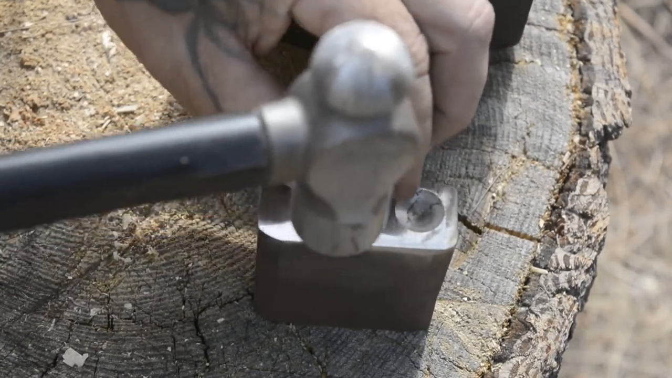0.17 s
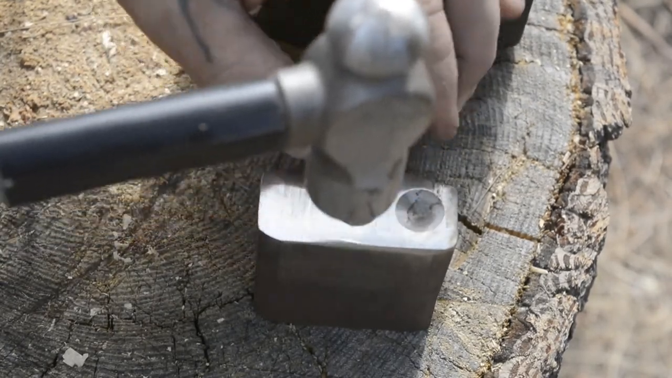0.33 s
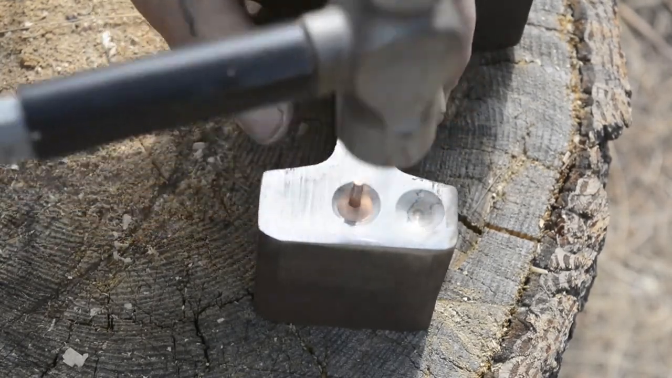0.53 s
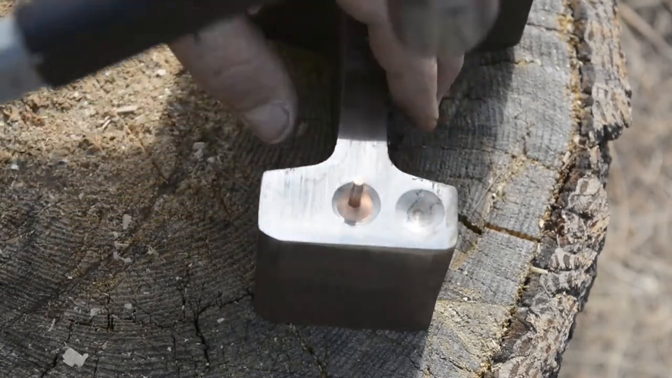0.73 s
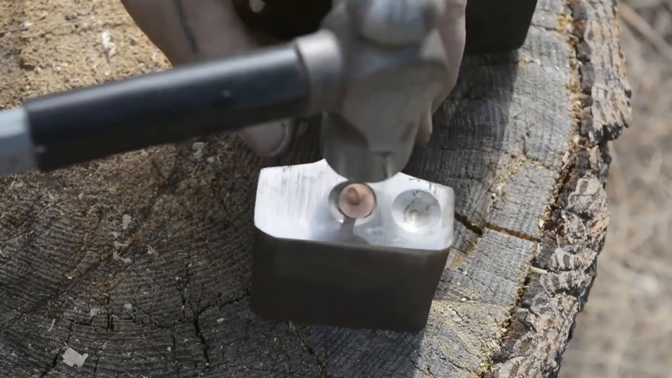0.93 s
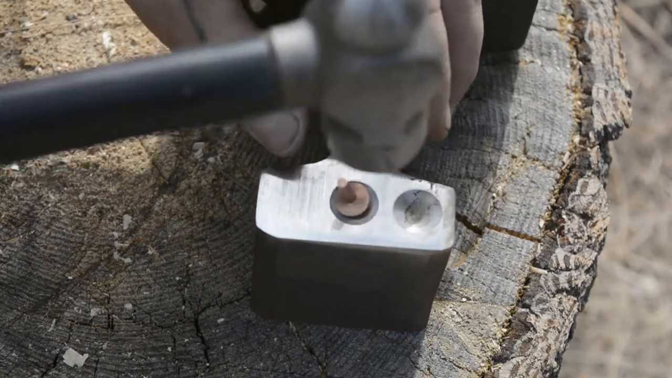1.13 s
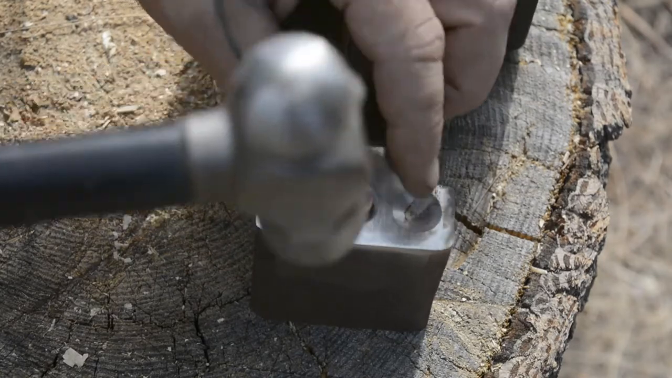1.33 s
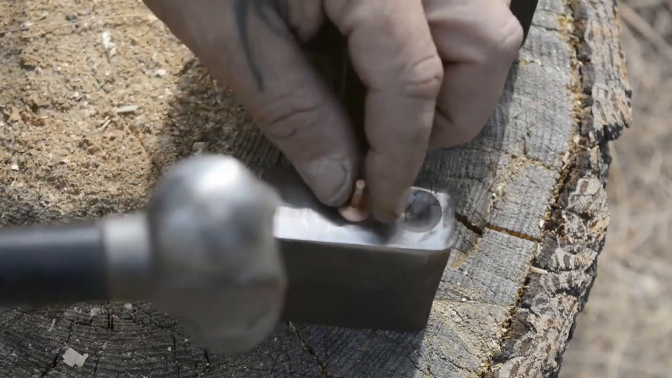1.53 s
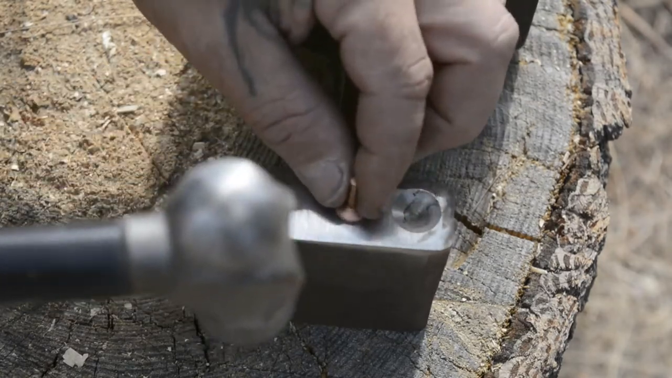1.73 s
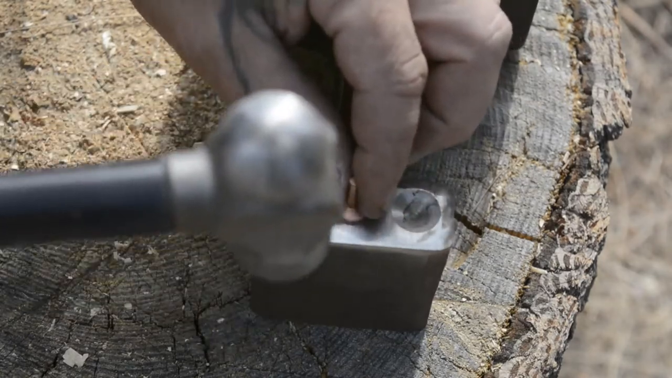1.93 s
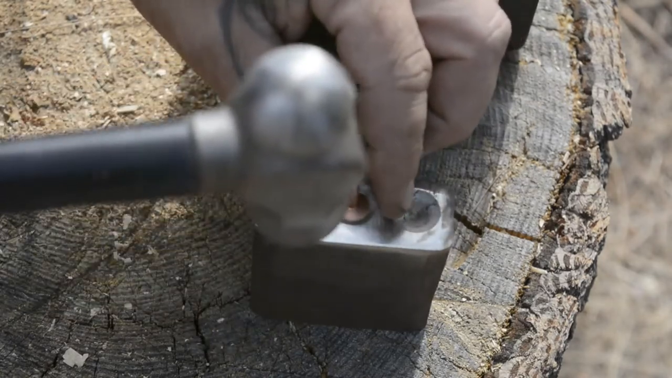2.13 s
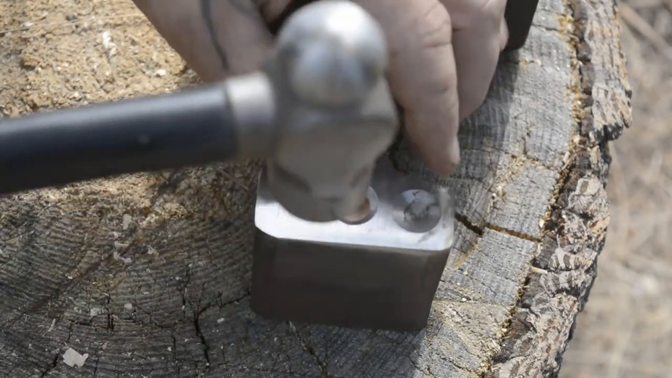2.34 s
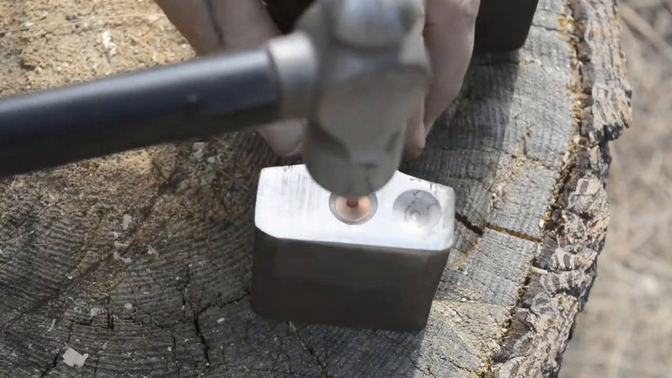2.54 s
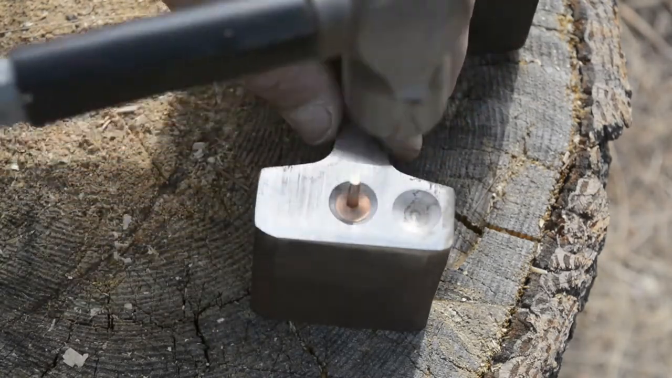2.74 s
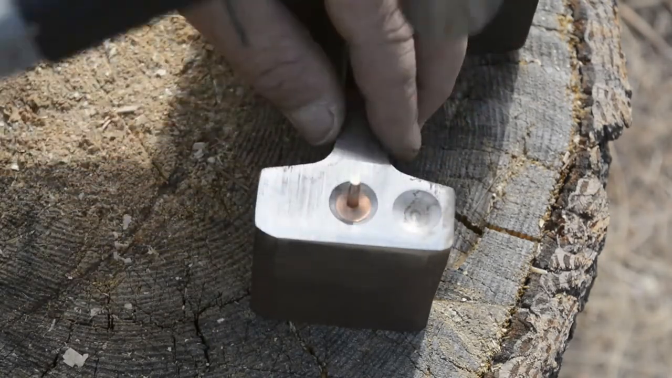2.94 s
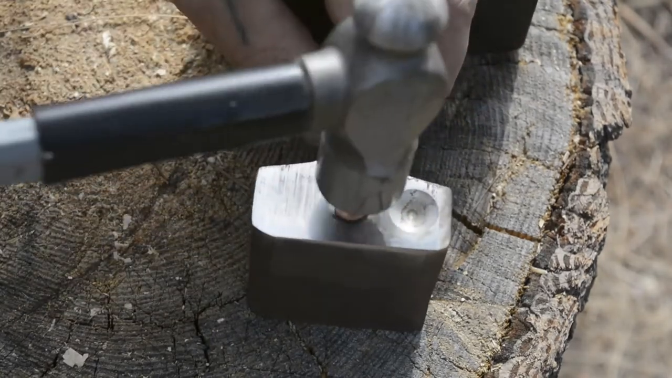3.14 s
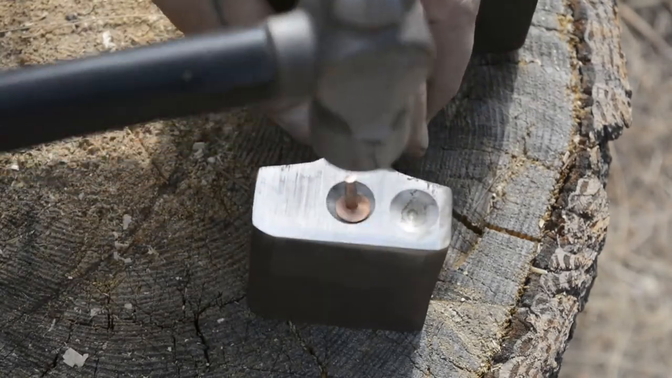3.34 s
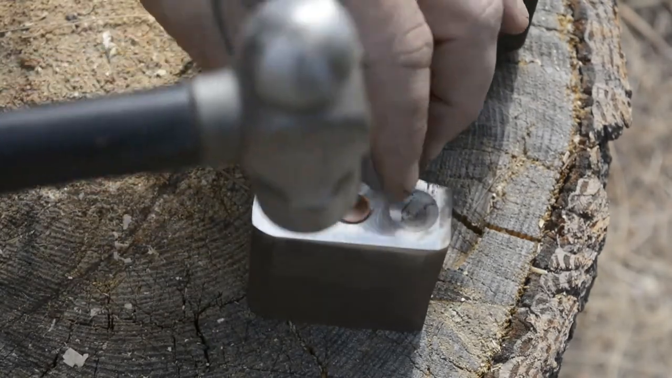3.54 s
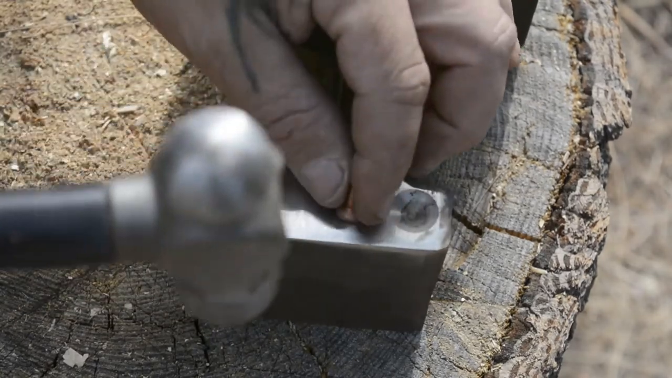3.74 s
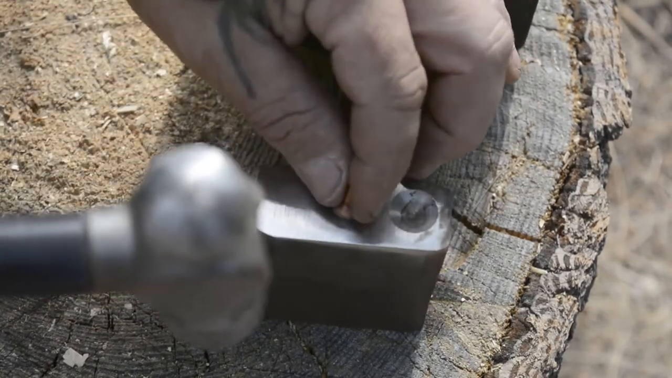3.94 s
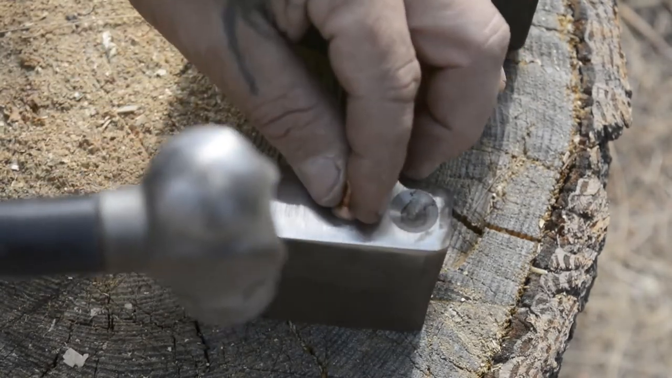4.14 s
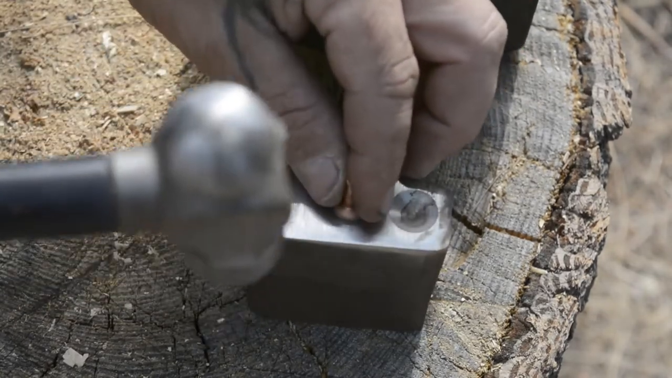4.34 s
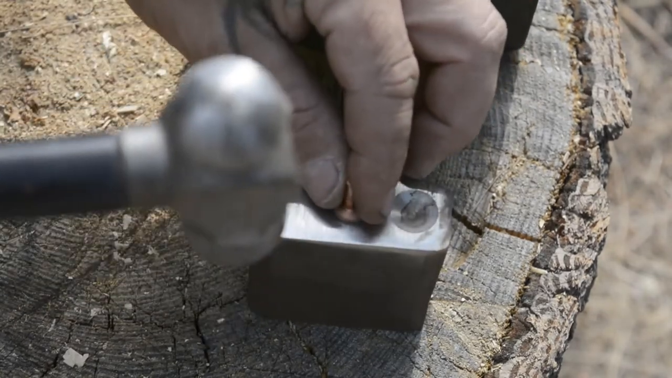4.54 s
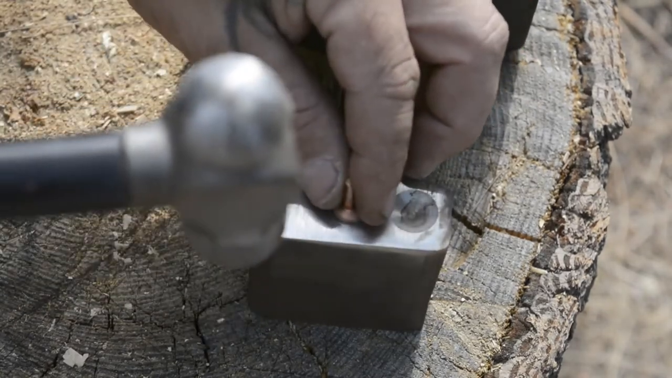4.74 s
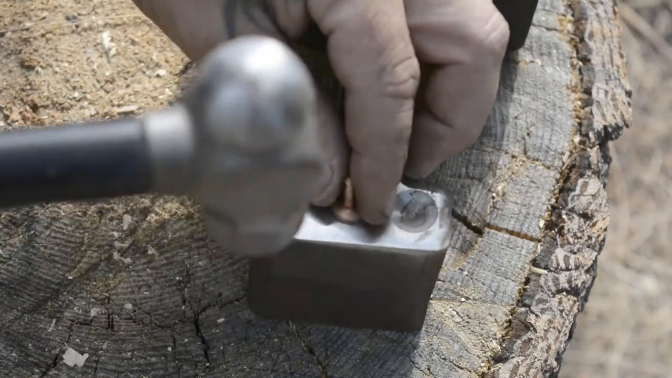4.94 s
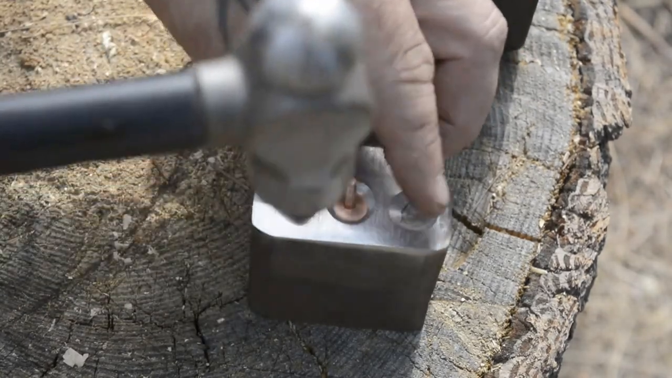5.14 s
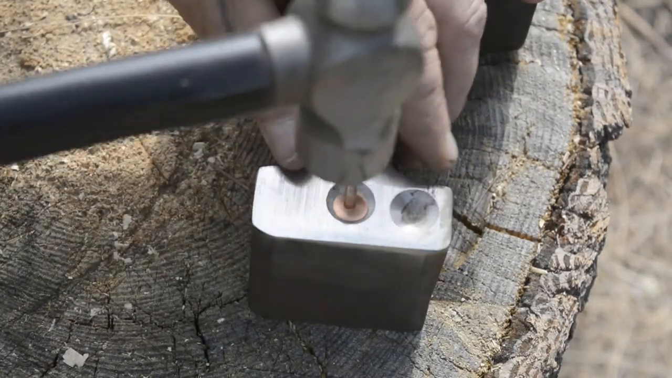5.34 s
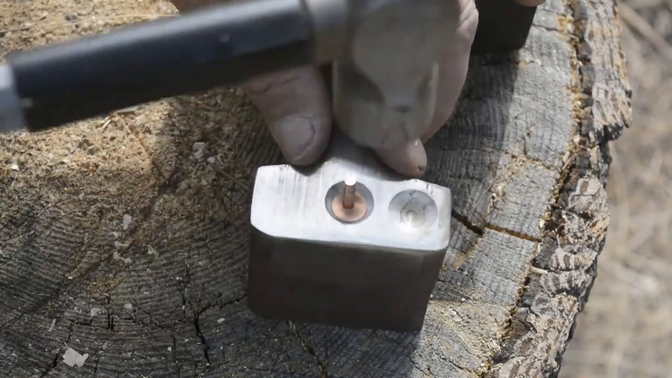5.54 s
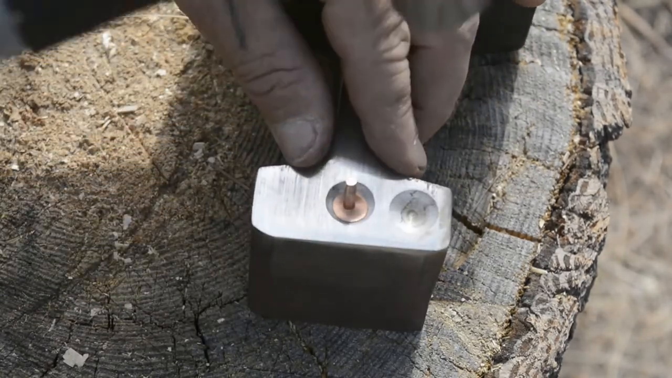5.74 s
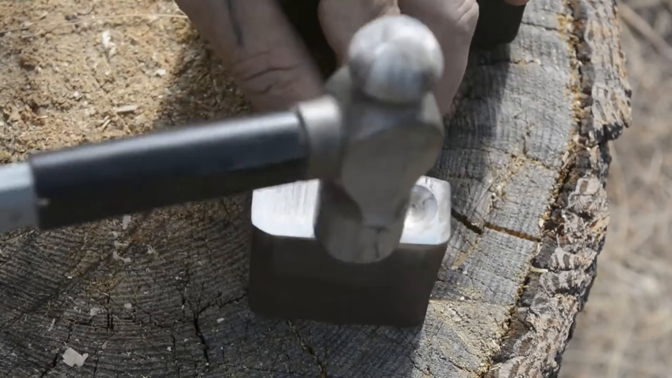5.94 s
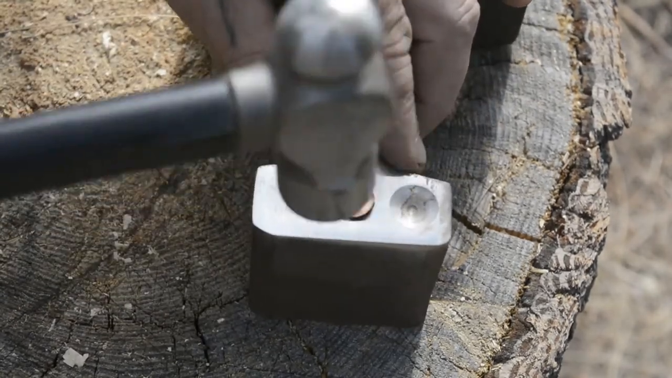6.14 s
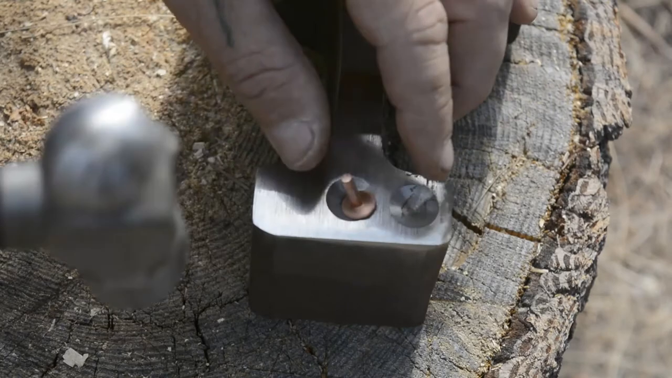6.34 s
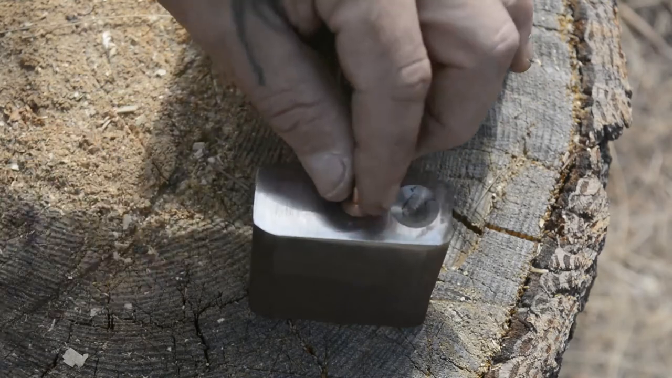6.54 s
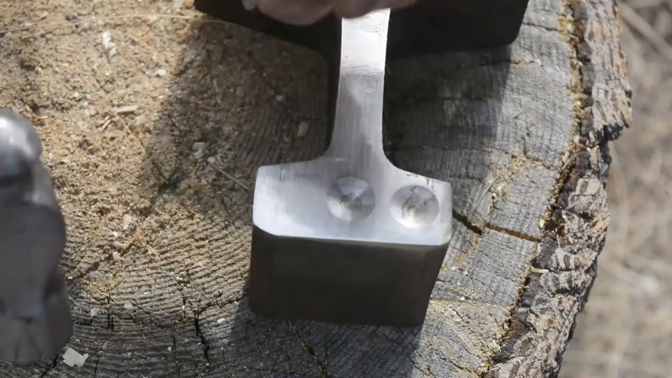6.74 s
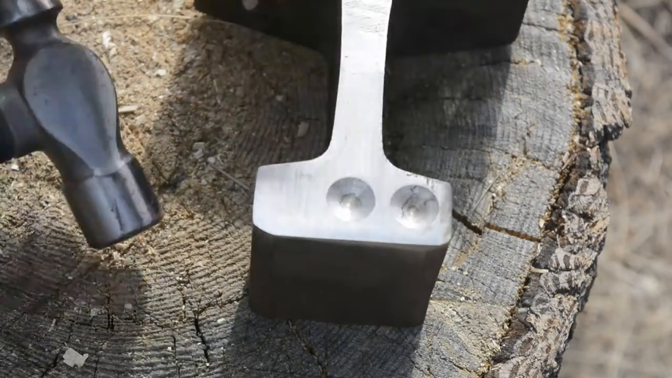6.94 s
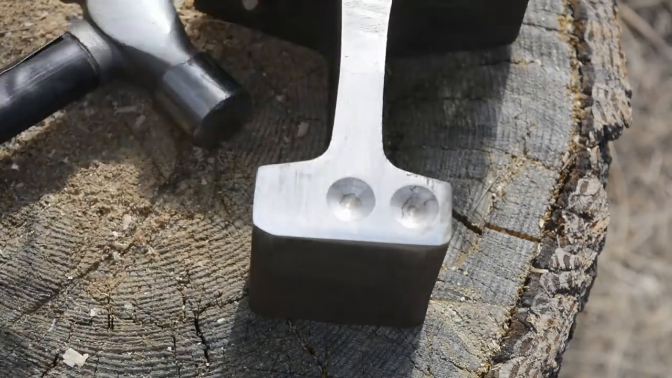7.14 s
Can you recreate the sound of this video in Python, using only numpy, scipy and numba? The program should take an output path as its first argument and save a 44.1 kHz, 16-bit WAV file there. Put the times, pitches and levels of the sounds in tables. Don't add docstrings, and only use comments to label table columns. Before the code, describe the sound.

Three widely spaced hammer blows crack on a copper rivet in a steel block, thudding into a wooden stump outdoors, with short rings and rattles.

```python
import sys
import numpy as np
from scipy import signal
from scipy.fft import rfft, irfft, next_fast_len
from scipy.io import wavfile
from scipy.ndimage import uniform_filter1d
from numba import njit

SR = 44100
rng = np.random.default_rng(int(sys.argv[2]) if len(sys.argv) > 2 else 0)


def invert_db(level):
    return 10 ** (np.asarray(level, dtype=float) / 20)


def inscribe(sig):
    pcm = np.round(np.clip(np.atleast_2d(sig).T, -1, 1) * 32767)
    wavfile.write(sys.argv[1], SR, pcm.astype(np.int16))


N = 316939


def level(x, db):
    return x * invert_db(db) / np.sqrt(np.mean(x ** 2))


def peak(x, db):
    return invert_db(db) * x / np.max(np.abs(x))


def clock(length_s):
    return np.arange(int(length_s * SR)) / SR


def add(out, start_s, sound):
    i = int(start_s * SR)
    out[i:i + len(sound)] += sound[:max(N - i, 0)]


def fade(t, t60_s):
    return np.exp(-np.log(1000) * t / t60_s)


def ring(modes, length_s):
    t = clock(length_s)
    return sum(invert_db(db) * fade(t, t60_s) * np.sin(2 * np.pi * hz * t) for hz, db, t60_s in modes)


def knock(modes, contact_s, db, grit_db=-27):
    push = np.sin(2 * np.pi * np.linspace(0, 1, max(int(2 * contact_s * SR), 4)))
    grit = invert_db(grit_db) * rng.standard_normal(900) * fade(np.arange(900) / SR, 0.039)
    grit[0] = 1
    pushed = signal.fftconvolve(ring(modes, 0.12), push)
    return peak(signal.fftconvolve(pushed, grit), db)


def coloured(points, db):
    hz, shape_db = np.transpose(points)
    size = next_fast_len(N)
    bins_hz = np.arange(size // 2 + 1) * SR / size + 1
    gain = invert_db(np.interp(np.log(bins_hz), np.log(hz), shape_db))
    return level(irfft(rfft(rng.standard_normal(size)) * gain, size)[:N], db)


# start_s, thud_db, crack_db, contact_ms, ring_time_factor
BLOWS = [
    (0.7612, 1, -5.5, 0.85, 0.88),
    (2.9607, 1.5, -9, 0.5, 0.7),
    (5.7778, -1.5, -9.5, 0.587, 0.61),
]
# freq_hz, level_db, t60_s
STUMP = [(140, -49, 0.026), (244, -8, 0.051), (378, 17.5, 0.0067), (507, 4.5, 0.033), (641, 4.5, 0.04),
         (786, 11.5, 0.047), (886, 7, 0.014), (1050, 3, 0.046), (1161, 8, 0.007), (1390, 2.5, 0.011),
         (1802, -2.5, 0.073), (1930, -26, .015)]
# freq_hz, level_db, t60_s
SNAP = [(1130, -3, 0.018), (1382, 7, 0.0068), (1717, -20.5, 0.014), (2810, -13, 0.0013), (3370, -8, 0.0038)]
# freq_hz, level_db, t60_s
CRACK = [(2940, 11, 0.0022), (4240, -24, .004), (5300, -3.5, 0.0057), (5710, 7.5, 0.0035),
         (6780, -21, 0.003), (8680, -2, 0.0048), (10500, 9.5, 0.00089), (11700, 3, 0.0011),
         (15200, -23, 0.0034)]
STEEL_HZ = [1711, 2296.2, 2296.8, 4705, 5987, 7192, 7973, 9585, 11600, 12200, 14360]
# t60_s, first_blow_db, second_blow_db, third_blow_db
STEEL = [(1.34, -57.5, -51, -42), (2.9, -57, -72, -83), (0.74, -36.5, -28.5, -28), (0.55, -53, -44, -53),
         (0.73, -49.5, -43, -48), (0.48, -45, -35.5, -39.5), (0.64, -77, -62, -58), (0.62, -52, -53, -60),
         (1.2, -63, -74, -60), (0.19, -49, -70, -62), (0.42, -61.5, -66.5, -64)]


def copper_crack(db):
    t, slip_s = np.arange(200) / SR, 0.00054
    slips = rng.standard_normal(200) * t * np.exp(-t / slip_s)
    return peak(signal.fftconvolve(ring(CRACK, 0.03), slips), db)


def steel_ring(blow, time_factor):
    lift_s, rocks_s, free_db_per_s = 0.0055, 0.082, 26
    modes = [(hz, row[1 + blow] + 6.24, row[0] * time_factor * 0.96) for hz, row in zip(STEEL_HZ, STEEL)]
    steel = ring(modes, 1.2)
    since = np.arange(len(steel)) / SR
    hold = invert_db(-free_db_per_s * np.maximum(rocks_s - since, 0))
    return steel * hold * np.minimum(since / lift_s, 1)


def blows():
    out = np.zeros(N)
    for k, (start_s, thud_db, crack_db, contact_ms, time_factor) in enumerate(BLOWS):
        add(out, start_s, knock(STUMP, contact_ms / 1000, thud_db + 7, grit_db=-33))
        add(out, start_s, knock(SNAP, 0.00025, 8.5, grit_db=-31.5))
        add(out, start_s, copper_crack(crack_db + 9.5))
        add(out, start_s, steel_ring(k, time_factor))
    return out


# start_s, level_db, contact_ms
BUMPS = [(0.7884, -14, 0.5), (0.7955, -19.5, 0.32), (0.8125, -21, 0.37), (0.815, -14, 1.02),
         (0.8198, -27, 0.42), (0.844, -32, 1.8), (0.852, -27.5, 2.7), (0.860, -35, 0.92),
         (2.9963, -20, 1.06), (3.002, -26, 0.31), (3.0113, -10, 0.75), (3.035, -19, 0.56),
         (3.0409, -17, 0.72), (3.0542, -23, 1.36), (3.0595, -33, 0.48), (3.068, -31, 1.7),
         (3.076, -37, 1.9), (3.0806, -37.5, 1.16), (4.434, -46, 0.67), (4.465, -48, 1.3),
         (5.8189, -15.5, 0.62), (5.823, -38, 0.67), (5.830, -26, 0.52), (5.838, -22.5, 0.94),
         (5.855, -33, 1.2), (6.889, -54, 1.5)]


def rocking():
    out = np.zeros(N)
    for start_s, db, contact_ms in BUMPS:
        add(out, start_s, -knock(STUMP, contact_ms / 1000, db + 3, grit_db=-21.5))
    return out


def rim_clicks():
    out = np.zeros(N)
    for start_s, db, _ in BUMPS:
        add(out, start_s, knock(SNAP, 0.00023, db - 11.5, grit_db=-18))
    return out


# start_s, level_db, pitch_hz
TICKS = [(.781, -25, 12900), (.785, -17, 10700), (.7878, -34, 9600), (.7955, -33, 10000), (.804, -34, 8600),
         (0.8097, -39, 10500), (0.8145, -29, 10000), (.855, -42, 9750), (2.9932, -30, 10600),
         (2.9975, -29, 11800), (3.0035, -39, 8600), (3.008, -17.5, 12700), (3.018, -45, 12200),
         (3.0362, -42, 10500), (3.0414, -41, 12000), (3.0584, -40, 12400), (3.0678, -29, 12500),
         (5.8226, -35, 10200), (5.831, -40, 11000), (5.8335, -33, 12900), (5.8345, -33, 10500),
         (5.850, -40, 10700)]
# start_s, level_db, pitch_hz
CLINKS = [(.785, -30, 6060), (.7965, -33, 4500), (0.804, -28.5, 6260), (0.81, -34, 3360),
          (0.814, -35, 6300), (.845, -46, 6000), (3.0044, -49, 3800), (3.007, -38, 6000),
          (3.036, -41, 5000), (3.0444, -50, 5400), (5.7884, -40, 4670), (5.8202, -36, 3400),
          (5.825, -45, 5500), (5.832, -41, 5200), (5.834, -33, 6000), (5.8554, -48, 3400)]


def rattle():
    out = np.zeros(N)
    for start_s, db, hz in TICKS + CLINKS:
        t60_s = 62 / hz
        contacts = rng.standard_normal(70) * np.hanning(70)
        cluster = [(hz, 0, t60_s), (hz * 0.9, -5, t60_s * 0.7), (hz * 1.1, -5, t60_s * 0.7),
                   (hz * 0.76, -18, t60_s * 0.6), (hz * 1.22, -14, t60_s * 0.5)]
        tick = signal.fftconvolve(ring(cluster, 0.03), contacts)
        tick = signal.sosfilt(signal.butter(3, hz * 0.8, "high", fs=SR, output="sos"), tick)
        add(out, start_s, peak(tick, db + 8))
    return out


# start_s, level_db
LAID = [
    (7.1803, -17.5),
]
# freq_hz, level_db, t60_s
PLANK = [(450, -18, 0.018), (724, 3, 0.012), (1090, 4, 0.0086), (1660, -6.5, 0.11), (2140, -20, 0.014),
         (2980, -13, 0.014), (3480, -6, .008), (4000, -12, .006), (6000, -6, .006), (8060, 1, .05)]


def hammer_laid():
    out = np.zeros(N)
    for start_s, db in LAID:
        add(out, start_s, -knock(PLANK, 0.00022, db, grit_db=-36))
    return out


def voice(rows, orders_db, rough):
    s, hz, db = np.transpose(rows)
    t = s[0] + clock(s[-1] - s[0])
    phase = 2 * np.pi * np.cumsum(np.interp(t, s, hz)) / SR
    waver = uniform_filter1d(rng.standard_normal(len(t)), 900) * 30
    edge = np.clip(np.minimum(t - s[0], s[-1] - t) / 0.0049, 0, 1)
    tone = sum(invert_db(order_db) * np.sin((k + 1) * phase) for k, order_db in enumerate(orders_db))
    return np.sqrt(2) * tone * edge * invert_db(np.interp(t, s, db) + rough * waver)


# time_s, pitch_hz, level_db
BIRD = [
    [(2.68, 2060, -58), (2.70, 1740, -63), (2.718, 1616, -58), (2.735, 1560, -70), (2.78, 1460, -63)],
    [(2.712, 3290, -65), (2.742, 3150, -66), (2.78, 2940, -59), (2.818, 2830, -51.5), (2.85, 2730, -55.5),
     (2.875, 2470, -58), (2.885, 2240, -60), (2.92, 1860, -60)],
]


def bird():
    out = np.zeros(N)
    for rows in BIRD:
        add(out, rows[0][0], voice(rows, [0], rough=0.57))
    return out


# start_s, length_s, pitch_hz, level_db
LOWING = [
    (1.419, 0.68, 143.3, -58),
    (3.92, 0.57, 141.9, -56.5),
    (6.94, .6, 142.4, -57),
]
LOWING_ORDERS_DB = [-3, -9, -32, -15.5, -27, -23]


def lowing():
    attack_s, release_s, edge_db, tire_db = 0.045, 0.064, -21, -2
    sag_hz_per_s, drop_hz = 3.1, 4.0
    out = np.zeros(N)
    for start_s, length_s, hz, db in LOWING:
        end_s = start_s + length_s
        tired_hz = hz - sag_hz_per_s * length_s
        rows = [(start_s, hz, db + edge_db), (start_s + attack_s, hz, db),
                (end_s - release_s, tired_hz, db + tire_db), (end_s, tired_hz - drop_hz, db + edge_db)]
        add(out, start_s, voice(rows, LOWING_ORDERS_DB, rough=1.5))
    return out


# peak_s, level_db
PUFFS = [(.18, -56), (.42, -47.5), (.95, -52), (1.43, -56.5), (2.17, -53), (2.46, -47), (2.9, -53),
         (3.43, -53), (3.92, -53.5), (4.4, -56), (4.65, -57), (5.0, -56), (5.41, -48), (5.9, -54),
         (6.41, -51), (6.93, -50)]


def wind():
    t = np.arange(N) / SR
    rise_s, fall_s = 0.033, 0.056
    slow = uniform_filter1d(uniform_filter1d(rng.standard_normal(N), size=3000), size=3000)
    flutter_db = level(slow, db=0) * 2.5
    breeze = coloured([(8, -21), (25, -5.5), (60, -6), (110, -16.5), (220, -43.5)], -61)
    puffs = sum(invert_db(db) * np.exp(-((t - s) / np.where(t < s, rise_s, fall_s)) ** 2) for s, db in PUFFS)
    buffet = coloured([(8, -2), (25, -2), (55, -7.5), (90, -14.5), (200, -44)], 0)
    return breeze * invert_db(flutter_db) + puffs * buffet


# freq_hz, density_db (per Hz)
AIR = [(47, -18), (80, 1.5), (156, -2), (209, -6.5), (239, -4), (292, -7.5), (651, -8.5), (1300, -13),
       (14100, -17), (15400, -14), (16500, -43)]


def air():
    return coloured(AIR, -52.5)


def scene():
    near = blows() + rocking() + rim_clicks() + rattle() + hammer_laid()
    near = signal.sosfilt(signal.butter(2, 130, "high", fs=SR, output="sos"), near)
    near = signal.sosfilt(signal.butter(4, 12700, fs=SR, output="sos"), near)
    mono = near + bird() + lowing() + wind() + air()
    return np.array([mono, mono])


# freq_hz, density_db (per Hz)
SELF = [(12, -33), (20, 0), (289, -1), (566, -2.5), (652, -3), (2580, -4.5), (15200, -5.5), (16500, -6.5)]


def amplifier_hiss():
    side = coloured(SELF, -57.5)
    return np.array([side, -side])


# pitch_hz, level_db
WHINE = (13727, -79)


def electronics_whine():
    hz, db = WHINE
    waver = uniform_filter1d(rng.standard_normal(N), 1500) * 55
    return waver * invert_db(db) * np.sin(2 * np.pi * hz * np.arange(N) / SR)


@njit
def follow(x, rise, fall):
    e, y = 0., np.empty(len(x))
    for i in range(len(x)):
        e += (abs(x[i]) - e) * (rise if abs(x[i]) > e else fall)
        y[i] = e
    return y


def gain_control(x, heard):
    limit_db, ratio, attack_s, release_s = -18, 2.6, 0.004, 0.078
    loudness = follow(heard, 1 / (attack_s * SR), 1 / (release_s * SR))
    return x * np.minimum(1, invert_db(limit_db) / (loudness + 1e-9)) ** (1 - 1 / ratio)


def round_peaks(x):
    top = np.where(x > 0, 0.72, 1.02)
    return top * np.tanh(x / top)


def roll_off(x):
    return signal.sosfilt(signal.butter(12, 15900, fs=SR, output="sos"), x)


def record(dry):
    x = dry + electronics_whine() + amplifier_hiss()
    x = round_peaks(gain_control(x, heard=dry[0]))
    x = signal.sosfilt(signal.ellip(8, 0.2, 60, 15750, fs=SR, output="sos"), x)
    return roll_off(x)


dry = scene()
out = record(dry)
inscribe(out)
```